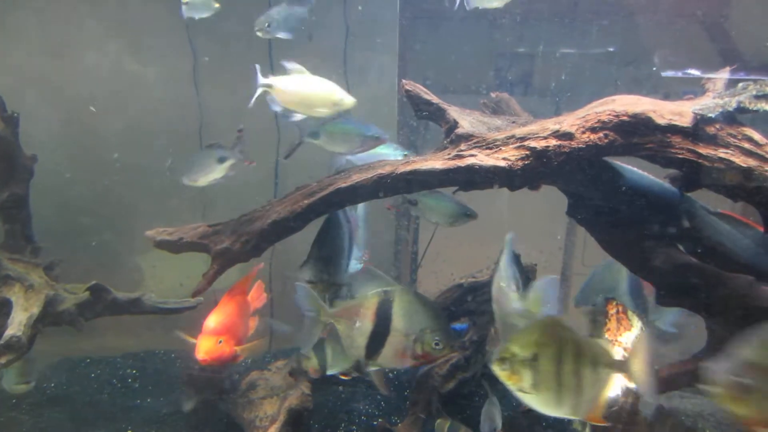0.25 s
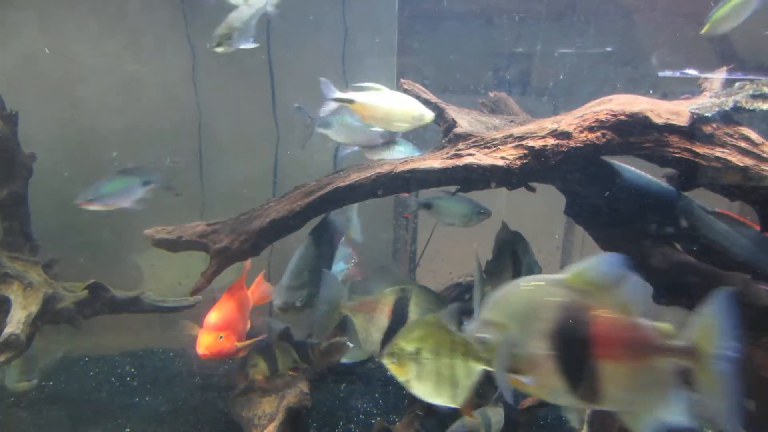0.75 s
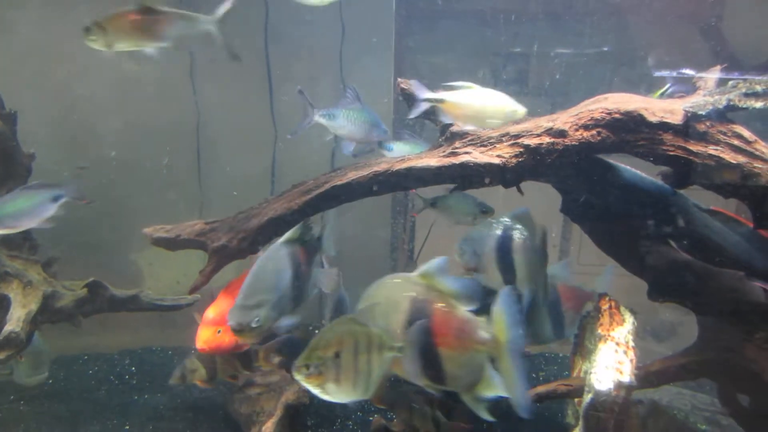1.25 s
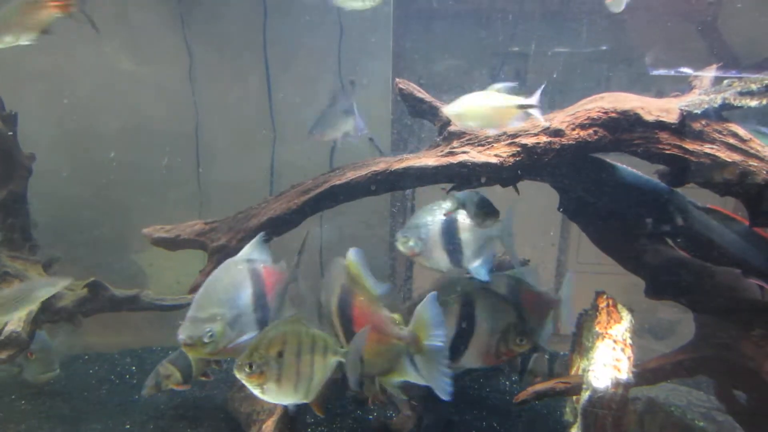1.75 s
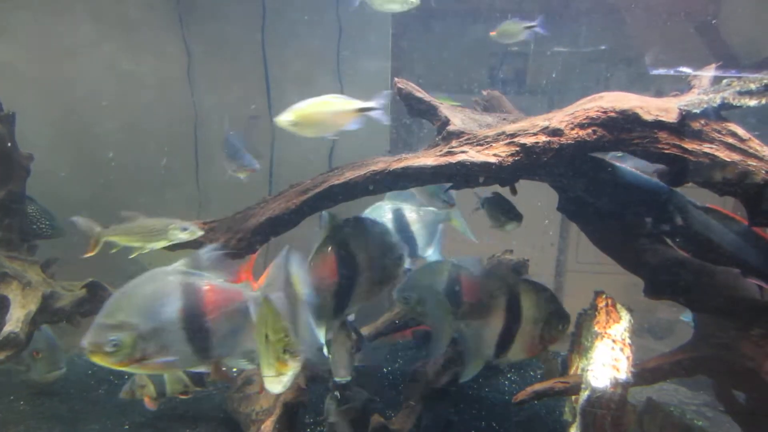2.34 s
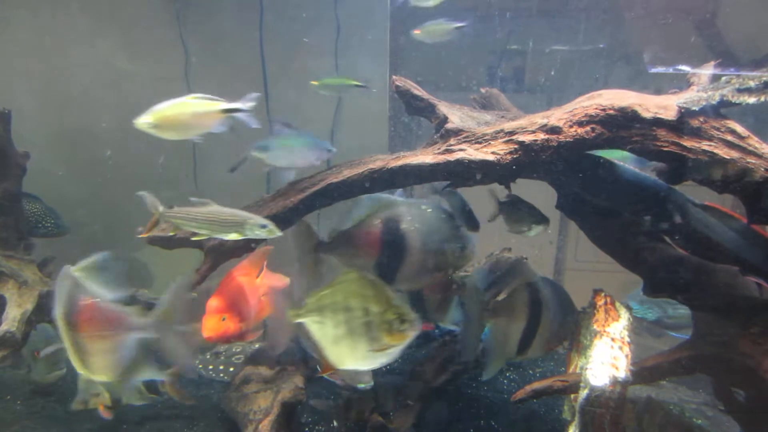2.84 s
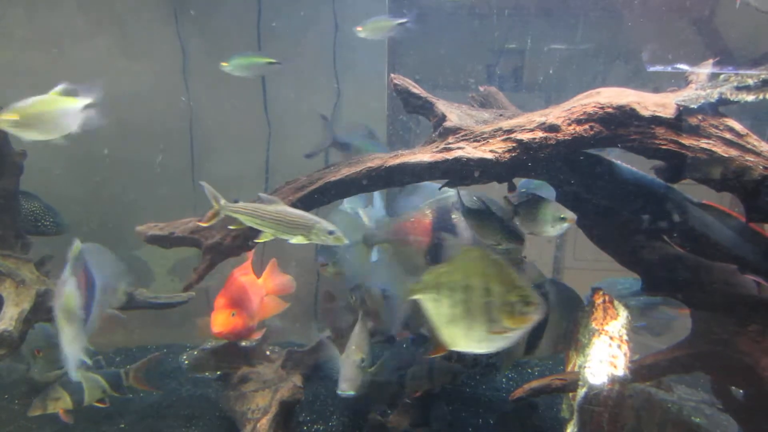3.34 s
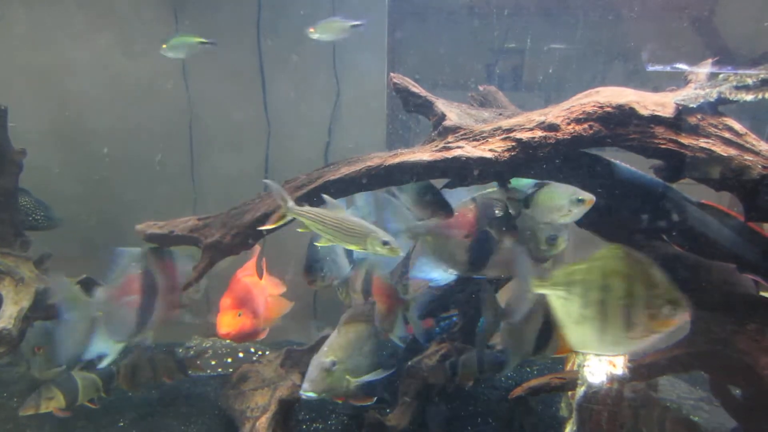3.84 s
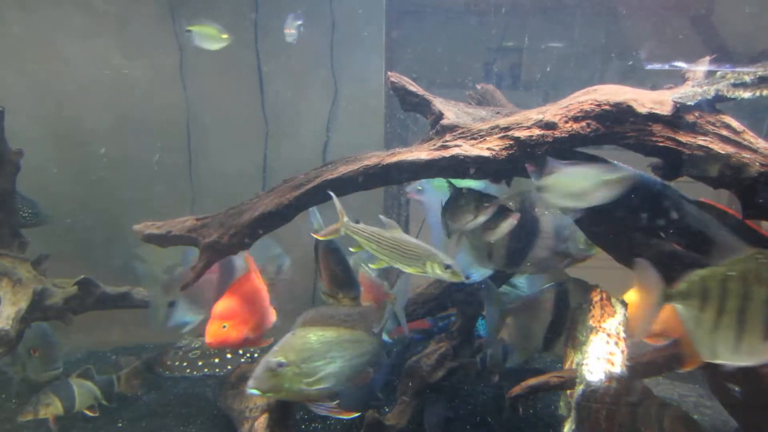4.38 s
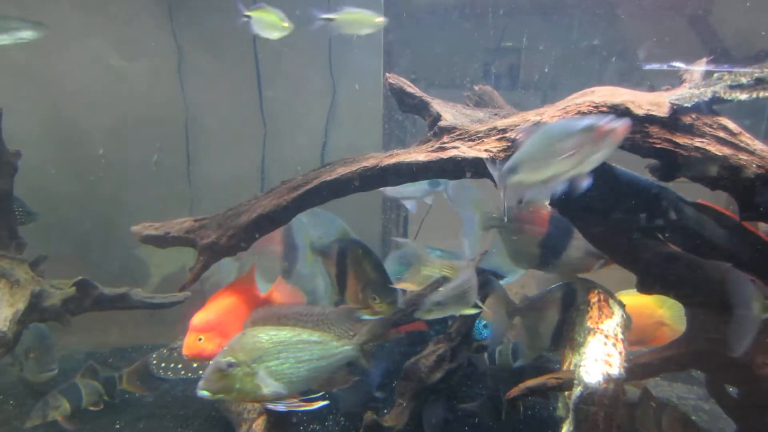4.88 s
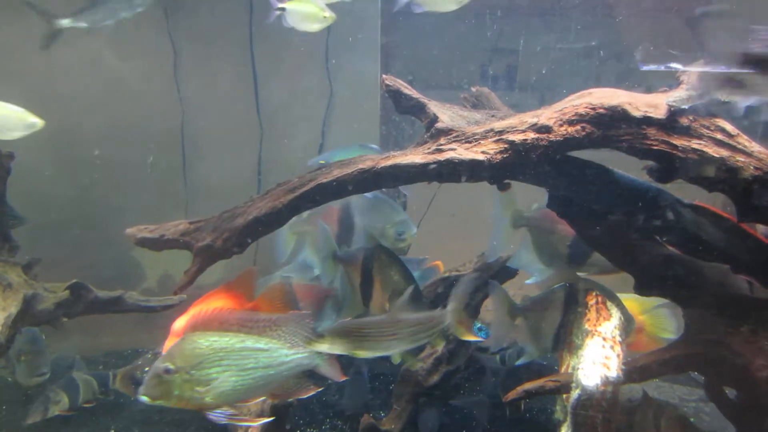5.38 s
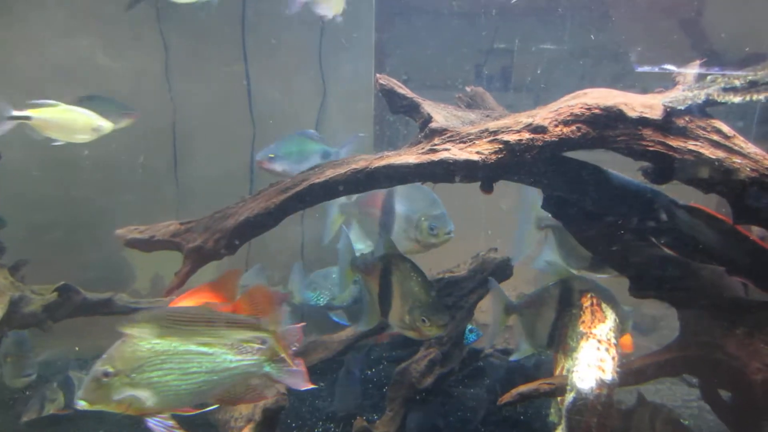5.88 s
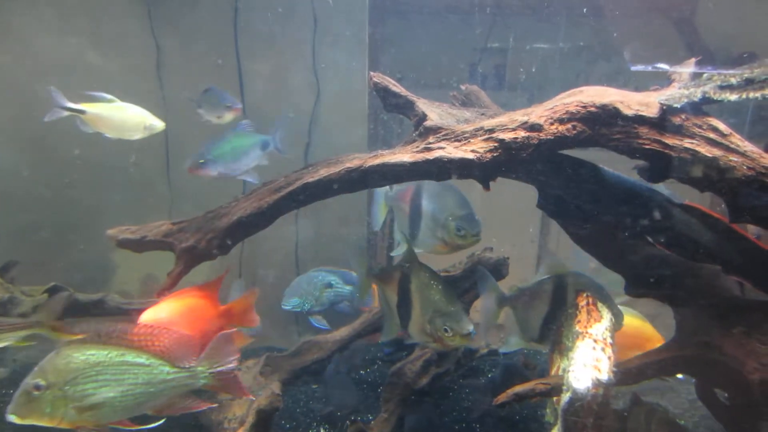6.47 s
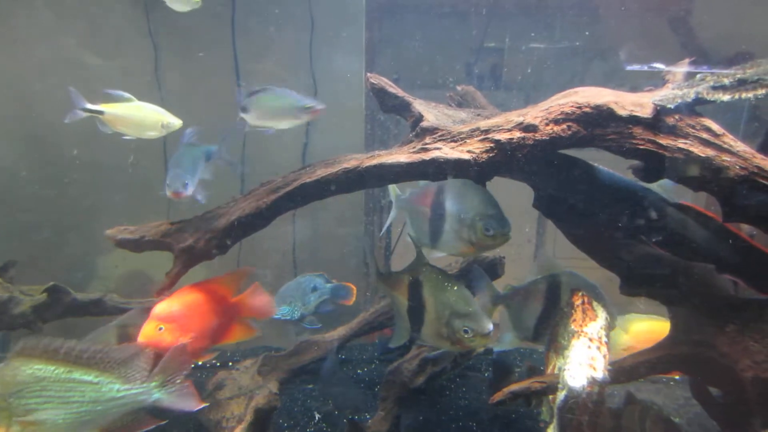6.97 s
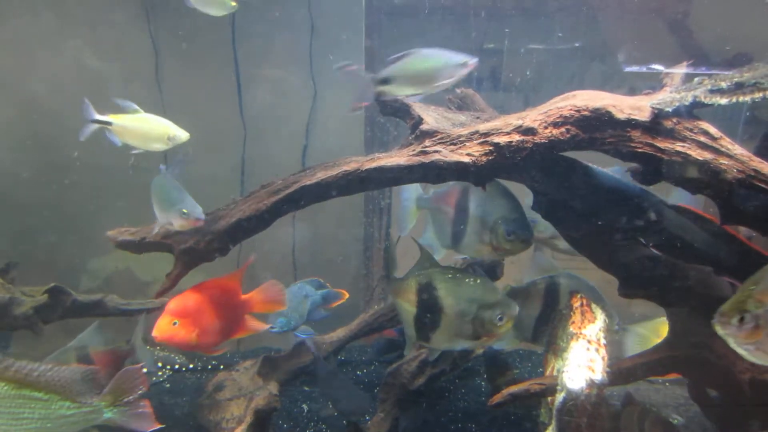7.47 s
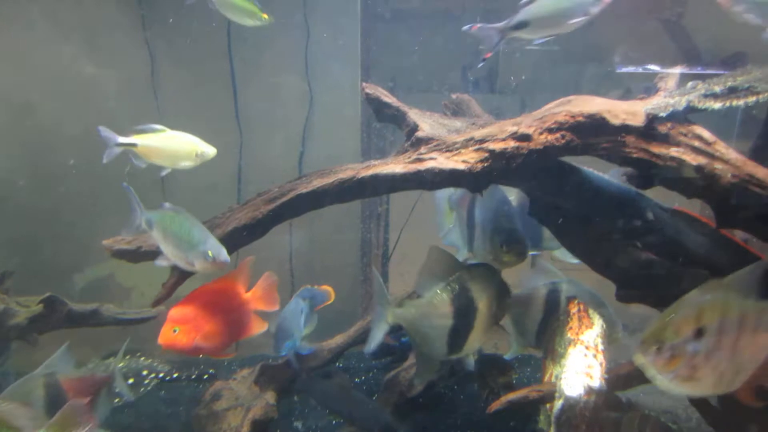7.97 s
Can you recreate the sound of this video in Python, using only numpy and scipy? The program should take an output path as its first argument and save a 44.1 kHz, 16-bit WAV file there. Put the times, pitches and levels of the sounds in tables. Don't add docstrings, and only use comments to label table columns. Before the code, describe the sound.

A constant low pump drone with a fluttering beat fills the room beside a fish tank, while small bubbles gurgle and tiny drops tick.

```python
import sys
import numpy as np
from scipy import signal
from scipy.fft import rfft, irfft, next_fast_len
from scipy.io import wavfile
from scipy.ndimage import uniform_filter1d

SR = 44100
rng = np.random.default_rng(int(sys.argv[2]) if len(sys.argv) > 2 else 0)


def boost_factor(decibels):
    exponent = np.asarray(decibels, float) / 20
    return 10 ** exponent


def to_wav(sig):
    pcm = np.clip(np.atleast_2d(sig), -1, 1) * 32767
    pcm = np.round(pcm).astype(np.int16)
    wavfile.write(sys.argv[1], SR, pcm.T)


N = 362502

# order (multiple of its rate), level_db (rms)
AIR_PUMP_ORDERS = [(1, -35.8), (2, -41.2), (3, -50.0), (4, -33.6), (5, -42.6), (6, -48.6), (8, -58.3),
                   (9, -49.9), (10, -62.7), (11, -64.5), (16, -62.0), (18, -62.6), (24, -70.5), (27, -74.5)]
# order, level_db (rms)
WATER_PUMP_ORDERS = [(1, -45.4), (2, -31.8), (3, -37.7), (4, -34.2), (5, -37.3), (6, -29.4), (7, -48.4),
                     (8, -49.6), (10, -66.0), (11, -61.2), (12, -56.6), (20, -62.2)]
# order, level_db (rms)
FILTER_PUMP_ORDERS = [(1, -52.0), (2, -35.7), (3, -41.8), (4, -61.5), (5, -35.2), (6, -52.6), (10, -62.2),
                      (20, -54.6), (40, -65.9)]
# frequency_hz, level_db (per Hz)
SURFACE_FIZZ = [(1200, -110), (2200, -87.5), (3800, -88), (5100, -85), (7000, -89), (10500, -91),
                (13000, -97.5), (15700, -102)]
# frequency_hz, likeness (-1 to 1)
PORT_LIKENESS = [(100, 0.94), (1000, 1), (1400, 0.47), (1700, 0.68), (2200, 0.19), (3000, -0.053),
                 (5000, -0.33), (7000, -0.039)]
# peak_s, level_db (peak), pitch_hz
BUBBLE_EVENTS = [(0.640, -41, 1700), (0.751, -44, 5940), (1.018, -37, 1690), (1.145, -31, 818),
                 (1.63, -28.5, 683), (2.009, -35, 1050), (2.312, -31.5, 757), (2.59, -37.5, 1705),
                 (2.798, -35, 1720), (2.826, -35, 1100), (3.278, -39, 1460), (3.289, -35, 740),
                 (3.813, -36.5, 675), (4.063, -36, 1082), (4.797, -32.5, 1680), (4.801, -26, 690),
                 (5.007, -37, 1141), (5.19, -35, 1130), (5.215, -37, 790), (5.525, -45, 2900),
                 (5.887, -39, 1660), (5.94, -37, 776), (5.972, -43, 1850), (6.393, -38, 1090),
                 (6.417, -45, 2410), (6.677, -37, 1100), (7.194, -38, 1614), (7.372, -39, 6200),
                 (7.498, -42, 1950)]
# start_s, level_db (peak), pitch_hz
DROP_EVENTS = [(0.7298, -40, 10500), (1.061, -41.5, 10400), (1.2775, -43, 10400), (2.272, -41.5, 11950),
               (3.3508, -41.5, 14800), (3.4306, -43, 13500), (3.5509, -42, 13200), (3.6995, -39, 12700),
               (3.8761, -40.5, 10300), (5.1497, -42, 12400), (5.288, -40.5, 14200), (7.1647, -42.5, 9540),
               (7.3303, -30, 12500), (7.9948, -41.5, 11800)]
# frequency_hz, width_hz, level_db (per Hz)
RUSH_MODES = [(41.0, 4.7, -64.5), (52.3, 5, -62.5), (63.2, 13, -55.5), (74, 5.2, -56.5), (92.3, 5.8, -49),
              (103.7, 3.8, -45.5), (107.5, 19, -45), (166.4, 56, -53.5), (210.7, 11.7, -55),
              (233, 9.3, -49.5), (248.7, 34.6, -49), (281.7, 39, -49), (336, 71, -56.5),
              (391.3, 13, -58.5), (429, 45, -58.5), (510, 61, -64), (620, 94, -71.5), (701, 17, -71.5),
               (838, 360, -67.5), (1031, 45, -67.5), (1128, 144, -69.5), (1334, 296, -73),
               (1704, 350, -77.5), (1905, 78, -76.5), (2065, 890, -85.5)]


def read(points, hz):
    f, value = np.transpose(points)
    return np.interp(np.log(hz + 1), np.log(f + 1), value)


def drift(top_hz):
    t = np.arange(0, N + 64, 64) / SR
    rates = top_hz * np.geomspace(.04, 1, num=24)
    turns = rates * t[:, None] + rng.random(len(rates))
    slow = (np.sin(2 * np.pi * turns) / np.sqrt(rates)).sum(1)
    return np.interp(np.arange(N) / SR, t, (slow - slow.mean()) / slow.std())


def port_noise(power):
    size = next_fast_len(N)
    hz = np.fft.rfftfreq(size, 1 / SR)
    a, b, c, d = rng.standard_normal((len(hz), 4)).T
    same = np.clip(read(PORT_LIKENESS, hz), -1, 1)
    left = a + 1j * b
    right = same * left + np.sqrt(1 - same ** 2) * (c + 1j * d)
    pair = np.array([left, right])
    return irfft(pair * np.sqrt(power(hz) * SR * size) / 2, size)[:, :N]


def blip(hz, cycles, rise):
    u = np.linspace(0, 1, int(SR * cycles / hz))
    shape = u * np.exp(-5 * u)
    tone = np.sin(2 * np.pi * cycles * (u * (1 - rise / 2) + rise * u ** 2))
    return shape / shape.max() * (1 - u ** 4) * tone


def add(mix, start_s, sound):
    part = mix[round(start_s * SR):][:len(sound)]
    part += sound[:len(part)]


def echoes(x, t60, wet_db):
    t = np.arange(int(t60 * SR)) / SR
    tail = rng.standard_normal((len(t), 2)).T
    tail = tail * (rng.random((len(t), 2)).T < .05)
    tail = tail * boost_factor(-60 * t / t60) * (t > .002)
    wet = signal.fftconvolve(x * np.ones((2, 1)), tail / np.linalg.norm(tail[0]), axes=1)[:, :N]
    return x + boost_factor(wet_db) * wet


def rush():
    f, width, db = np.transpose(RUSH_MODES)

    def power(hz):
        off = 2 * (hz[:, None] - f) / width
        return (boost_factor(db) ** 2 / (1 + off ** 2) ** 2).sum(1)

    return port_noise(power) * boost_factor(0.5 * drift(6.0))


def fizz():
    hiss = port_noise(lambda hz: boost_factor(read(SURFACE_FIZZ, hz)) ** 2)
    hz, t, z = signal.stft(hiss, SR, nperseg=256)
    patches = rng.standard_normal((len(t), len(hz))).T
    patches = uniform_filter1d(patches, size=16, axis=0)
    patches = uniform_filter1d(patches, size=4, axis=1)
    flicker = np.interp(t, np.arange(N) / SR, drift(110.0))
    top = np.clip((hz[:, None] - 4000.) / 4300.0, .15, 1)
    z = z * boost_factor(top * (1.5 * patches / patches.std() + 1.0 * flicker))
    return signal.istft(z, SR, nperseg=256)[1][:, :N]


def grains(per_s, lo_hz, hi_hz, cycles, spread_db, level_db, clump_db, count=24):
    out = np.zeros((2, N))
    busy = boost_factor(clump_db * drift(12.0))
    for hz in np.geomspace(lo_hz, hi_hz, num=count):
        hit = rng.random(N) < busy * per_s / count / SR
        train = hit * boost_factor(level_db + spread_db * np.minimum(rng.exponential(1, N), 4))
        out += rng.uniform(0.34, 1, (2, 1)) * signal.oaconvolve(train, blip(hz, cycles, .06))[:N]
    return out


def spray():
    return grains(120., 9000., 15500., 9., 4., -64.0, 7.)


def sputter():
    return grains(40., 2300., 6500., 27.0, 4.3, -59.0, 3.4)


def gurgle():
    low = grains(120., 557.0, 1250., 13.0, 2.7, -44.0, 5.)
    return low + grains(25., 1500., 1950., 20., 3., -49.5, 5.)


def ticks():
    rise_s, fall_s = .0004, .003
    out, t = np.zeros((2, N)), np.arange(600) / SR
    noises = rng.standard_normal((len(DROP_EVENTS), 2, len(t)))
    for (start_s, db, hz), noise in zip(DROP_EVENTS, noises):
        edges_hz = [max(.8 * hz, 8500), min(1.25 * hz, 17000)]
        band = signal.butter(1, edges_hz, "bandpass", fs=SR, output="sos")
        burst = signal.sosfilt(band, noise) * (1 - np.exp(-t / rise_s)) * np.exp(-t / fall_s)
        for port in range(2):
            add(out[port], start_s, boost_factor(db) * burst[port] / abs(burst[port]).max())
    return out


def bubbles():
    rise_cycles, trail_s, trail_db = 4.5, .018, -9.0
    out = np.zeros(N)
    for (peak_s, db, hz), draws in zip(BUBBLE_EVENTS, rng.random((len(BUBBLE_EVENTS), 2, 2))):
        start_s = peak_s - rise_cycles / hz
        add(out, start_s, boost_factor(db) * blip(hz, 28., .02))
        for late, size in draws:
            neighbour = blip(hz * (0.95 + 0.08 * size), 16.0, 0.03)
            add(out, start_s + trail_s * late, boost_factor(db + trail_db) * neighbour)
    return out


def motor(hz, orders, wander_hz, sway_db):
    angle = 2 * np.pi * np.cumsum(hz + wander_hz * drift(0.603)) / SR
    hum = sum(boost_factor(db) * np.cos(k * angle + 2 * np.pi * rng.random()) for k, db in orders)
    return np.sqrt(2) * hum * boost_factor(sway_db * drift(1.61))


def machines():
    air_pump = motor(59.974, AIR_PUMP_ORDERS, 0.0028, 0.43)
    water_pump = motor(58.047, WATER_PUMP_ORDERS, 0.0058, 0.22)
    filter_pump = motor(55.81, FILTER_PUMP_ORDERS, 0.0116, 0.96)
    return air_pump + water_pump + filter_pump


def scene():
    under_water = echoes(bubbles() + gurgle(), 0.11, -3.5)
    at_surface = echoes(ticks() + sputter() + spray(), .03, -9.)
    return rush() + fizz() + at_surface + under_water + machines()


def band_limit(x):
    return signal.sosfilt(signal.butter(12, 15800, fs=SR, output="sos"), x)


def record(dry):
    scan_hz, right_db = 15734.27, -8.5
    size = next_fast_len(N)
    hz = np.fft.rfftfreq(size, 1 / SR)
    comb = (1 + np.exp(-2j * np.pi * hz / scan_hz)) / 2
    sound = irfft(rfft(dry, size) * comb, size)[:, :N] * boost_factor(np.array([[0], [right_db]]))
    line = 2 * np.pi * scan_hz * np.arange(N) / SR
    whine = boost_factor(np.array([[-81.], [-71.5]])) * np.cos(line + np.array([[0], [2.5]]))
    half = boost_factor(np.array([[-90.], [-81.]])) * np.cos(line / 2 + np.array([[0], [.9]]))
    return band_limit(sound + whine + half)


dry = scene()
out = record(dry)
to_wav(out)
```